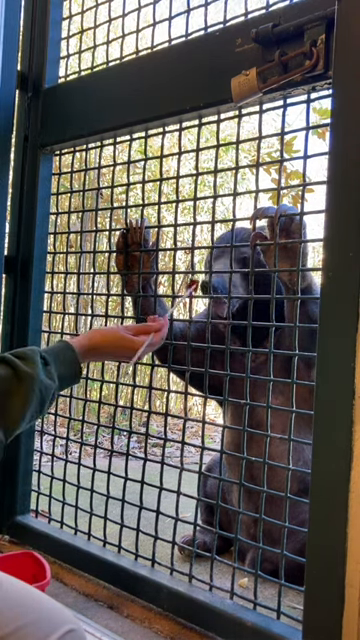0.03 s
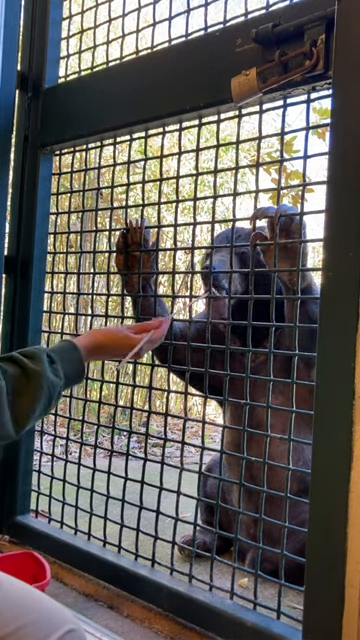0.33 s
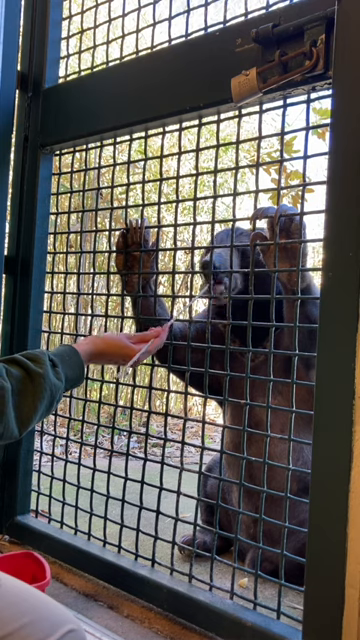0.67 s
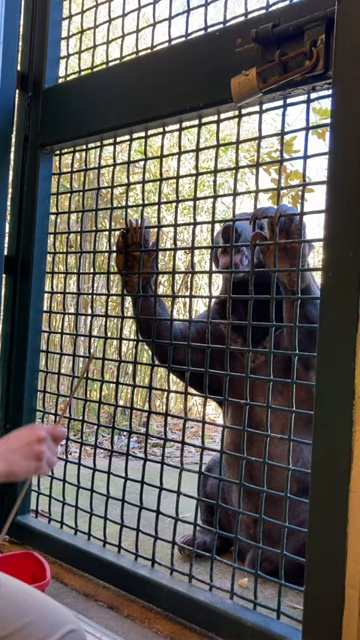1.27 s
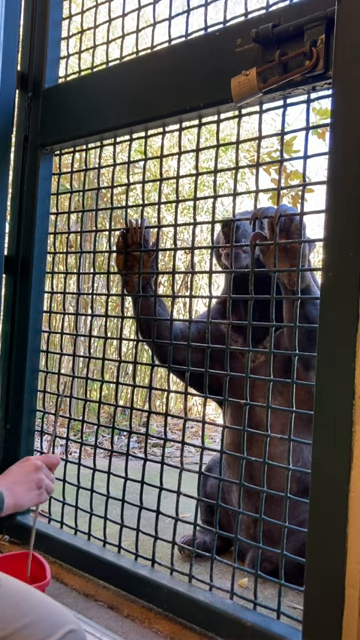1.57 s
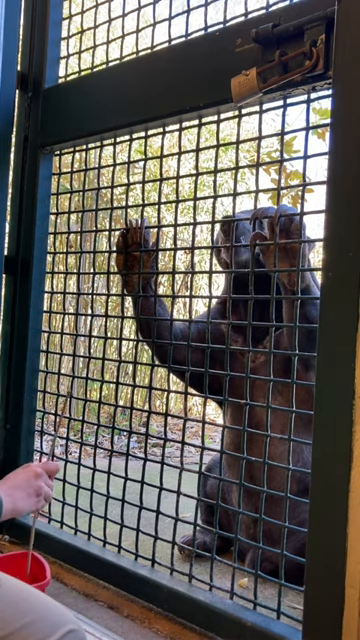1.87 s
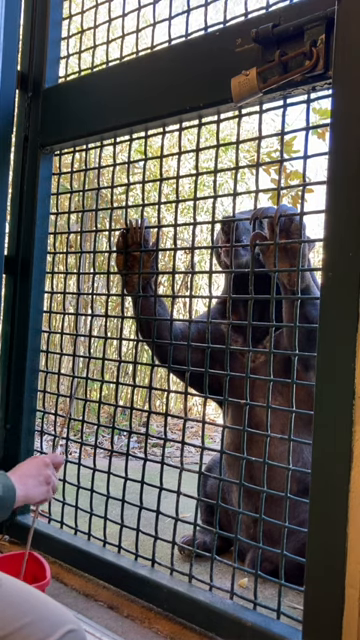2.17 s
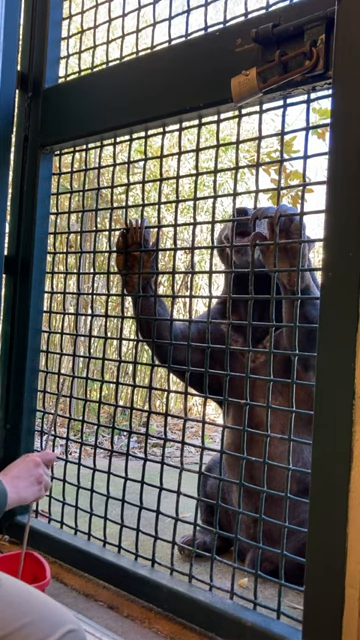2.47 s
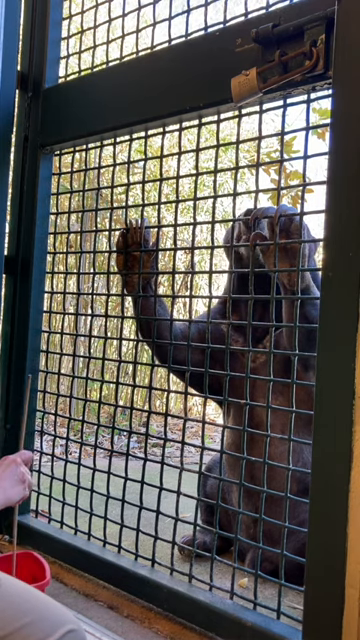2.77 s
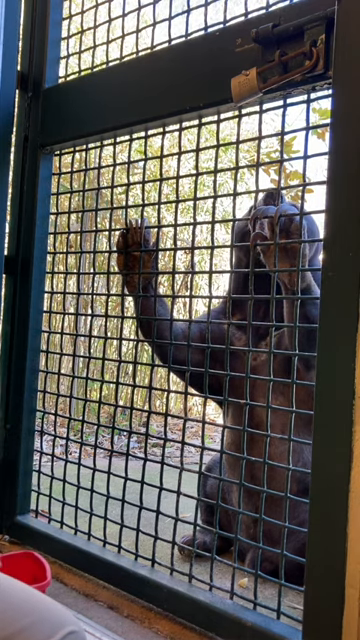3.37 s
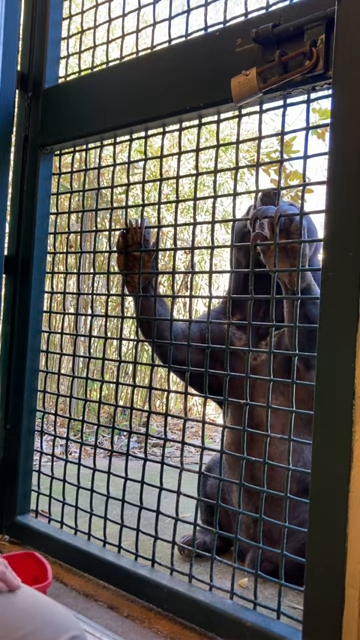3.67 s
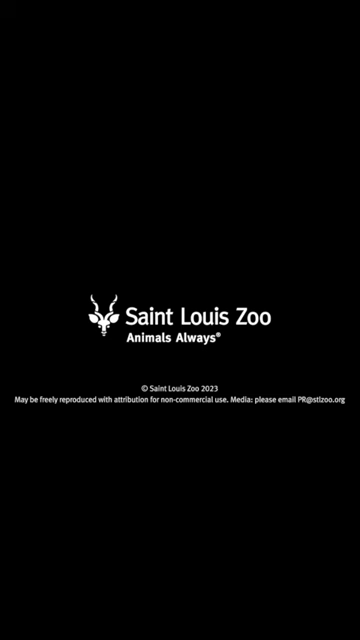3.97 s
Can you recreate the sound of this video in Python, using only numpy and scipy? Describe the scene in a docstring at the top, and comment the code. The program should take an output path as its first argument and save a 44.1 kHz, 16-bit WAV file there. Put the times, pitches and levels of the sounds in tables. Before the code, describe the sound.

Ventilation drones throughout in a hard-walled room, with a low hum, boomy rumble, rushing air and a faint whine. A soft scuff comes at the start, and a thin stick briefly hisses along wire mesh at 1.2 seconds. Faint squeaks follow near 2 seconds. The stick clicks against a plastic bucket at 2.6 and 3 seconds, with light rustling. Another scuff comes at 3.3 seconds, then a few fainter ticks.

```python
"""In a keeper's room beside a bear's mesh gate, ventilation drones: a low fan hum, a boomy rumble,
rushing air and a faint whine. At the left, a thin feeding stick hisses along the mesh and taps at
a plastic bucket, which knocks and rings. The hand rustles, and rubbing makes soft scuffs and squeaks.
The hard walls answer the stick briefly; the sound stops just before the end."""
import sys
import numpy as np
from scipy import signal
from scipy.fft import rfft, irfft, next_fast_len
from scipy.io import wavfile
from scipy.ndimage import uniform_filter1d, map_coordinates

SR = 44100
rng = np.random.default_rng(int(sys.argv[2]) if len(sys.argv) > 2 else 0)


def transcribe(u):
    """Save the signal u as a 16-bit wav file named by the first command-line argument.

    u: samples, shape (n,) or (channels, n), limited to [-1, 1]; the rate is SR.
    q: integer samples, one column per channel.
    """
    v = np.clip(np.atleast_2d(u).T, -1, 1)
    q = np.round(v * 32767).astype(np.int16)
    wavfile.write(sys.argv[1], SR, q)


N = 176400

# Low notes at which the room booms. Each row: pitch in Hz, width in Hz, strength in dB.
ROOM_NOTES = [(54.2, 4.5, 1.5), (80.2, 11, -0.5), (106, 10, -3), (146.3, 19.2, -11.5)]
# How the rumble, the hum and the rustle swell and sag. Each row: time in seconds, relative level in dB.
RUMBLE_LEVEL = [(0.0, -39.5), (0.04, -34.5), (0.2, -38.5), (0.23, -36.5), (1.6, -38.5), (1.75, -34.5),
                (1.79, -40), (2.47, -40.5), (2.56, -34.5), (2.65, -38.5), (3.46, -38), (3.48, -34),
                (3.72, -41), (3.8, -35)]
HUM_LEVEL = [(0, -82), (.25, -32.5), (.55, -36), (.9, -31.5), (1.15, -35), (1.45, -35), (2.0, -34.5),
             (2.5, -44), (2.78, -32), (2.9, -41.5), (3.2, -31.5), (3.8, -35.5)]
RUSTLE_LEVEL = [(0, -82), (.5, -76), (.68, -72.5), (.85, -73.5), (1.3, -70), (1.55, -81.5), (1.82, -65),
                (1.9, -73), (2.3, -74), (2.46, -59), (2.75, -60.5), (2.88, -66), (2.95, -57.5),
                (3.06, -54.5), (3.16, -83), (3.37, -59), (3.5, -81), (3.63, -62.5), (3.82, -67.5)]
# Steady fan tones. Each row: pitch in Hz, level in dB, pitch wander in Hz, level wander in dB.
FAN_TONES = [(282.9, -63.5, 3.18, 3.5), (314.6, -61, 1.2, -2.5), (593.2, -60, 2.5, -1)]
# How air and fan tones lean left. Each row: frequency in Hz, left minus right in dB.
LEFT_LEAN = [(100, 11), (250, 1.5), (600, 1.5), (1500, 0)]
# The colour (mix of low and high) of each noise. Each row: frequency in Hz, relative level in dB.
AIR_SHARED_COLOUR = [(100, -18), (170, -2), (200, -2.5), (240, -0.5), (295, -2), (400, -5), (480, -7),
                     (610, -6.5), (740, -11.5), (1110, -15), (1400, -17.5), (2150, -21.5), (2900, -27.5),
                     (4280, -30), (5500, -39), (8250, -32), (10300, -37.5), (11500, -59.5), (15000, -58)]
AIR_DIFFERENCE_COLOUR = [(35, -26.5), (60, 0.5), (85, -15.5), (300, -21.5), (440, -17), (600, -13.5),
                         (720, -17), (1210, -17), (1400, -23.5), (2200, -25), (3000, -31), (5900, -35.5),
                         (7600, -42.5), (8600, -69.5), (10500, -43), (12000, -43), (15000, -85)]
GRIT_COLOUR = [(400, -4), (1200, -1.5), (1600, -4.5), (2100, 2.5), (2550, -8), (3200, -7.5), (4600, -12.5),
               (6500, -33)]
RUSTLE_COLOUR = [(2000, 4), (4500, 3.5), (5700, -4.5), (8000, 1), (10000, 4.5), (12000, -29), (13500, 6.5),
                 (16000, -8)]
SLIDE_COLOUR = [(2000, -17.5), (3500, -2), (4800, 5), (5700, -5), (8000, 0), (10000, 4), (12000, -20.5),
                (13500, 9), (16000, -7.5)]
KNOCK_COLOUR = [(400, -22.5), (1100, -1.5), (2200, 0), (3000, 5.5), (4600, -8), (6000, -27)]
CRACK_COLOUR = [(2000, -17), (6000, -7), (8500, -4), (10500, 13), (12000, -5), (13500, 5.5), (16000, -2)]
TICK_COLOUR = [(1000, -16.5), (4000, -7.5), (5600, -12), (7000, 0), (8500, 4), (10200, 0), (12000, -29.5),
               (13500, -10.5), (16000, -21)]
# The walls' echo. Each row: frequency in Hz, fade in seconds. A fade is the time to fall by 60 dB.
ECHO_FADES = [(300, 0.33), (2000, 0.58), (8000, 0.18), (15000, 0.099)]
# Soft scuffs and faint far squeaks. Each row: start in seconds, level in dB, rise in seconds,
# fade in seconds, pitch in Hz, width in octaves.
SCUFFS = [(.03, -45, 0.029, 1.7, 348, 0.93), (.12, -57.5, .06, 0.87, 1170, 0.32),
          (1.05, -61.5, .07, .6, 1790, 0.53), (1.79, -59, 0.025, 0.3, 1540, 0.14),
          (1.84, -56, .022, 0.19, 1585, .04), (2.0, -61, 0.049, 0.7, 1540, 0.06),
          (2.87, -54, 0.043, .9, 640, 0.28), (3.255, -44, .035, 0.35, 625, 0.26),
          (3.275, -49.5, 0.016, 0.14, 930, 0.32), (3.3, -48.5, 0.06, 0.34, 603, 0.11),
          (3.335, -48, 0.03, 0.43, 677, 0.14), (3.68, -57.5, 0.021, 0.3, 1990, .35)]
# The stick on the wire. Each row: start in seconds, level in dB, rise in seconds, fade in seconds.
SLIDES = [(1.172, -47.5, 0.011, 0.22), (2.58, -43, 0.0078, 0.065), (2.6, -48, 0.016, 0.35),
          (3.6, -61.5, 0.032, 0.0576), (3.69, -56, 0.022, 0.14)]
# The bucket's ringing notes. Each row: pitch in Hz, relative level in dB, fade in seconds.
BUCKET_NOTES = [(1122, -1.5, 0.097), (1610, -6.5, 0.06), (1847, 0.5, 0.028), (2190, -2, 0.11),
                (3280, -5.5, 0.12), (4120, -11, 0.22)]
# Stick taps. Each row: start in seconds, level in dB, extra gain for the bucket in dB, tick pitch in Hz.
TAPS = [(0.6846, -47, -33, 8600), (1.986, -56.5, -13, 9500), (2.025, -52, -24, 8800),
        (2.579, -42, -3, 8200), (2.5877, -42, -19, 8500), (2.5906, -31.5, -2, 8900), (2.594, -39, -2, 8500),
        (2.64, -48.5, -16, 9000), (2.6467, -42, -16, 10000), (2.687, -47, -15, 8700),
        (2.934, -51.5, -17.5, 9500), (3.0415, -33.5, -13, 10000), (3.257, -53, 1, 8000),
        (3.582, -49.5, -8, 8700), (3.638, -52, -17, 9500), (3.709, -53, -10, 9000), (3.786, -67, -7, 13500),
        (3.821, -64, -5, 8500)]


def amp(db):
    """Turn decibels into a gain."""
    return 10 ** (np.asarray(db) / 20)


def unit(x):
    """Scale a signal to an average strength (rms) of 1."""
    return x / np.sqrt(np.mean(x ** 2) + 1e-20)


def along(points, hz):
    """Read between the rows of a frequency table, on a log scale."""
    f, v = np.transpose(points)
    return np.interp(np.log(hz + 1), np.log(f + 1), v)


def clock():
    """The time of every sample, in seconds."""
    return np.arange(N) / SR


def curve(rows):
    """Join the rows of a time table with straight lines."""
    return np.interp(clock(), *np.transpose(rows))


def wobble(rate):
    """A smooth curve through `rate` random values a second."""
    return map_coordinates(rng.standard_normal(size=2048), [clock() * rate + 2], mode="wrap")


def tone(hz, wander_hz):
    """A pure tone whose pitch wanders."""
    pitch = hz + wander_hz * wobble(8)
    return unit(np.sin(2 * np.pi * np.cumsum(pitch) / SR))


def filtered(x, response):
    """Multiply each frequency in x by response(frequency)."""
    size = next_fast_len(N + SR // 4)
    return irfft(rfft(x, size) * response(np.fft.rfftfreq(size, 1 / SR)), size)[..., :N]


def shaped_noise(response):
    """Noise of strength 1, shaped by a filter."""
    return unit(filtered(rng.standard_normal(N), response))


def noise(colour):
    """Noise that follows a colour table."""
    return shaped_noise(lambda hz: amp(along(colour, hz)))


def panned(db):
    """Left and right gains, with the left louder by db."""
    return amp(np.array([[.5], [-.5]]) * db)


def burst(start, rise, fade):
    """A level that climbs in a straight line, then dies away."""
    t = clock() - start
    return np.clip(t / rise, 0, 1) * np.exp(-np.log(1000) * np.clip((t - rise) / fade, 0, 2))


def patchy(x, depth_db=1.8):
    """Make small patches of time and frequency swell and fade at random."""
    spectra = signal.stft(x, nperseg=1024)[2]
    patches = uniform_filter1d(rng.standard_normal(spectra.shape), size=3, axis=0)
    patches = unit(uniform_filter1d(patches, size=4, axis=1))
    return unit(signal.istft(spectra * amp(depth_db * patches), nperseg=1024)[1][:N])


def rumble(low_cut_hz=41.7):
    """The ventilation makes the room boom at its low notes."""
    def response(f):
        power = sum(amp(2 * db) / (1 + ((f - hz) / width) ** 2) ** 2 for hz, width, db in ROOM_NOTES)
        return np.sqrt(power / (1 + (low_cut_hz / (f + 1)) ** 10))
    return amp(curve(RUMBLE_LEVEL) + 2) * shaped_noise(response)


def fan_drone():
    """The fan adds a swelling hum, a few higher tones and a faint whine to the rumble."""
    boom = rumble()
    hum = amp(curve(HUM_LEVEL) - 2) * tone(hz=57.8, wander_hz=1.34)
    out = (boom + hum) * panned(db=3.5)
    for hz, db, wander_hz, wander_db in FAN_TONES:
        level = amp(db + wander_db * wobble(5.66))
        out += level * tone(hz, wander_hz) * panned(along(LEFT_LEAN, hz))
    whine = amp(-71) * tone(hz=1155, wander_hz=12)
    return out + whine


def rushing_air(ripple_db=1.2, ripple_hz=14):
    """Air rushes all around, and the room colours it with fine peaks and dips."""
    def ripple(hz):
        return amp(ripple_db * map_coordinates(rng.standard_normal(4096), [hz / ripple_hz], mode="wrap"))
    shared = amp(-46.5) * patchy(filtered(noise(AIR_SHARED_COLOUR), ripple))
    difference = amp(-48.5) * patchy(filtered(noise(AIR_DIFFERENCE_COLOUR), ripple))
    sides = np.array([shared + difference, shared - difference])
    swell = amp(0.39 * wobble(2.7))
    return swell * filtered(sides, lambda hz: panned(along(LEFT_LEAN, hz)))


def wall_echo(x):
    """Hard walls send back a short blur of echoes, different on each side."""
    hz, t, spectra = signal.stft(rng.standard_normal((2, SR // 2)), SR, nperseg=256)
    fading = amp(-60 * t / along(ECHO_FADES, hz)[:, None])
    tail = signal.istft(spectra * fading, SR, nperseg=256)[1]
    return signal.fftconvolve(x[None], tail / np.linalg.norm(tail[0]), axes=1)[:, :N]


def scuffs(dull_ratio=1.2):
    """Rubbing makes noise around one pitch: a wide band scuffs, a narrow one squeaks."""
    grain = amp(2.5 * wobble(250))
    grit = unit(grain * np.array([noise(GRIT_COLOUR), noise(GRIT_COLOUR)]))
    out = amp(-42) * burst(start=3.251, rise=0.0082, fade=0.29) * grit  # opens the loudest scuff
    for start, db, rise, fade, hz, width in SCUFFS:
        def band(f):
            peak = 1 / (1 + (np.log2((f + 1) / hz) / width) ** 2) ** 2
            return peak / (1 + (f / (hz * dull_ratio)) ** 2)  # duller above the pitch
        out += amp(db) * burst(start, rise, fade) * shaped_noise(band)
    return out


def hand_rustle(grain_db=2.8, swell_db=1.2):
    """The moving hand makes a faint, finely grained rustle."""
    grain = amp(grain_db * wobble(300) + swell_db * wobble(25))
    return amp(curve(RUSTLE_LEVEL)) * unit(grain * noise(RUSTLE_COLOUR))


def stick_slides(grain_db=0.83):
    """The stick slides on the wire with short, grainy hisses."""
    level = sum(amp(db) * burst(start, rise, fade) for start, db, rise, fade in SLIDES)
    return level * unit(amp(grain_db * wobble(250)) * noise(SLIDE_COLOUR))


def bucket(knock_db=-8, ring_db=-6, rattle_radians=.55):
    """Each tap knocks the bucket and sets its notes ringing with a slight rattle."""
    t = np.arange(SR // 4) / SR
    ringing, knock_level = np.zeros(N + SR), np.zeros(N)
    rattles = [rattle_radians * wobble(200)[:len(t)] for _ in BUCKET_NOTES]
    for start, db, bucket_db, _ in TAPS:
        strength = amp(db + bucket_db)
        knock_level += strength * amp(knock_db) * burst(start, rise=.0004, fade=.032)
        for (hz, note_db, fade), rattle in zip(BUCKET_NOTES, rattles):
            level = strength * amp(ring_db + note_db + rng.normal(0, 2) - 60 * t / fade)
            phase = 2 * np.pi * (hz * t + rng.random()) + rattle
            ringing[round(start * SR):][:len(t)] += level * np.sin(phase)
    return ringing[:N] + knock_level * noise(KNOCK_COLOUR)


def stick_taps(peak_db=7, width_octaves=.13, crack_db=3):
    """Each time the stick hits, it gives a sharp crack and a bright tick with its own pitch."""
    out = np.zeros(N)
    crack_noise, tick_noise = noise(CRACK_COLOUR), noise(TICK_COLOUR)
    for start, db, _, tick_hz in TAPS:
        def peak(hz):
            return amp(peak_db / (1 + (np.log2((hz + 1) / tick_hz) / width_octaves) ** 2))
        tick = burst(start, rise=.0004, fade=.012) * unit(filtered(tick_noise, peak))
        crack = amp(crack_db) * burst(start, rise=.0002, fade=.004) * crack_noise
        out += amp(db) * (tick + crack)
    return out


def scene(left_lead_s=0.00013, echo_db=-5.5):
    """The stick's sounds reach the left side first, over the steady ventilation."""
    taps = stick_taps()
    handling = bucket() + stick_slides() + hand_rustle()
    lead_s = left_lead_s * np.array([[.5], [-.5]])  # left early, right late
    direct = filtered(taps + handling, lambda hz: np.exp(2j * np.pi * hz * lead_s))
    ventilation = fan_drone() + rushing_air()
    echo = amp(echo_db) * wall_echo(handling + amp(-2) * taps)
    return ventilation + direct + echo + scuffs()


def record(dry, stop_s=3.842, fade_s=0.016, top_hz=15900):
    """Stop the sound just before the end and cut off the highest treble."""
    fade_out = np.clip((stop_s - clock()) / fade_s, 0, 1)
    return filtered(dry * fade_out, lambda hz: hz < top_hz)


dry = scene()
out = record(dry)
transcribe(out)
```